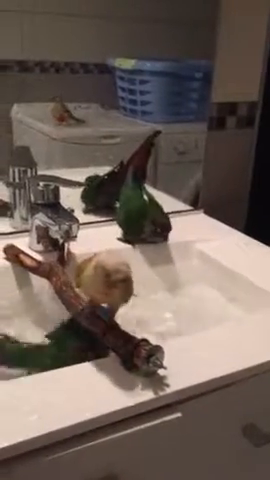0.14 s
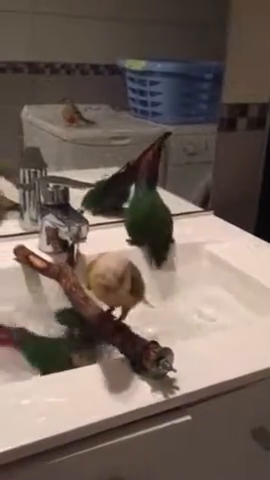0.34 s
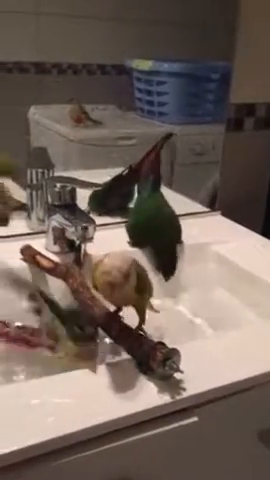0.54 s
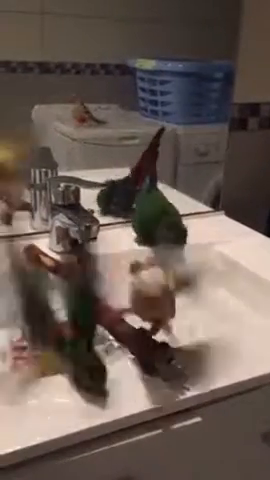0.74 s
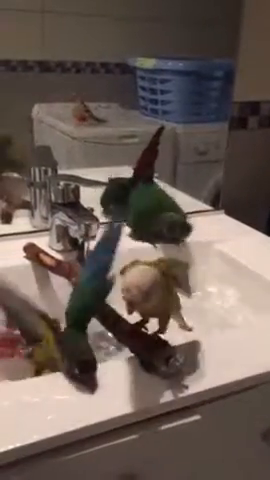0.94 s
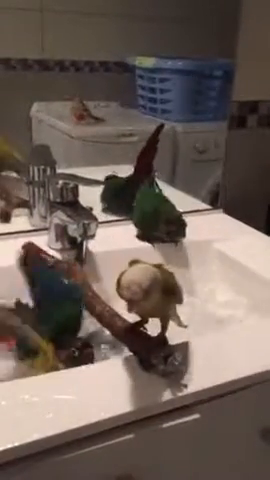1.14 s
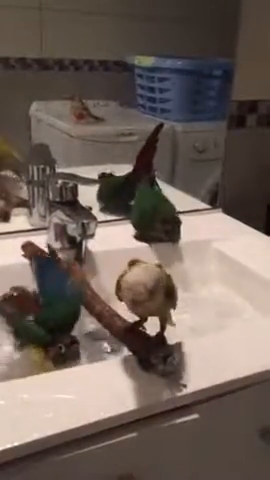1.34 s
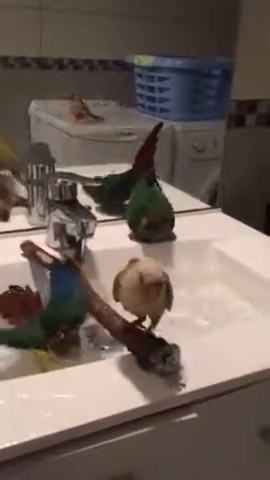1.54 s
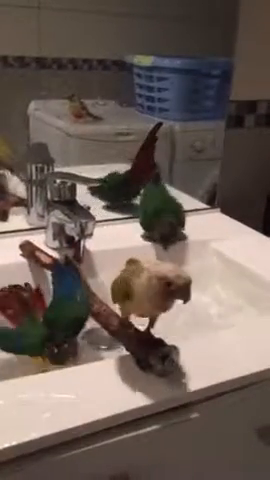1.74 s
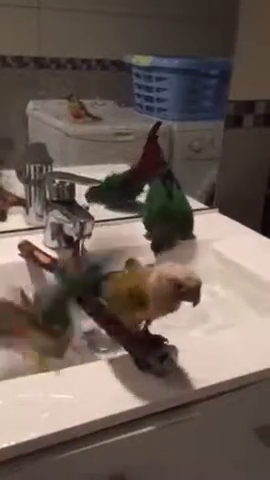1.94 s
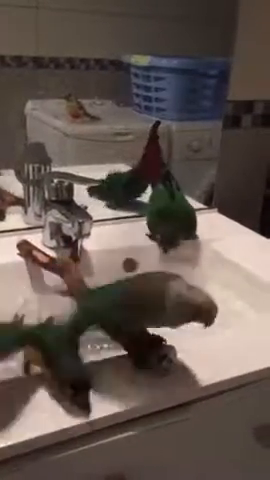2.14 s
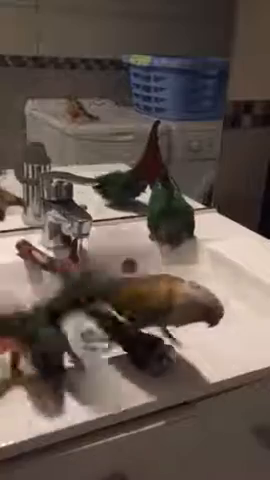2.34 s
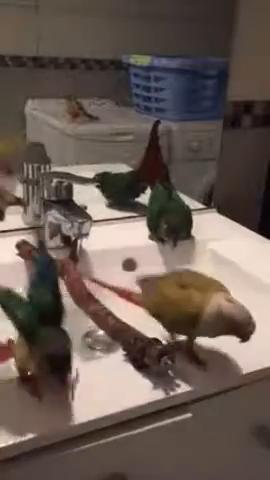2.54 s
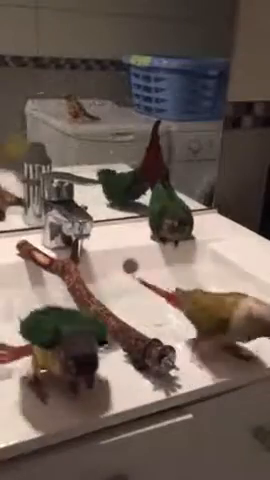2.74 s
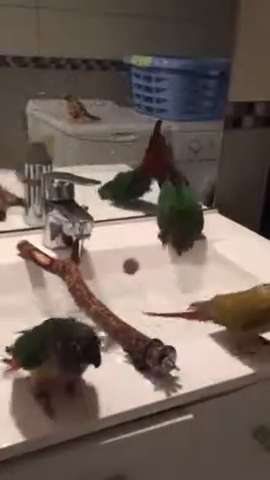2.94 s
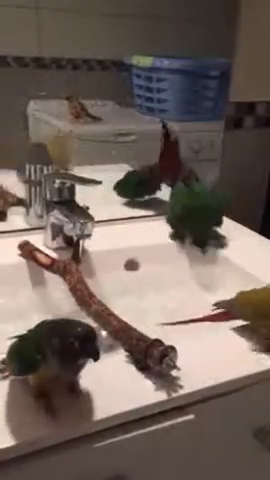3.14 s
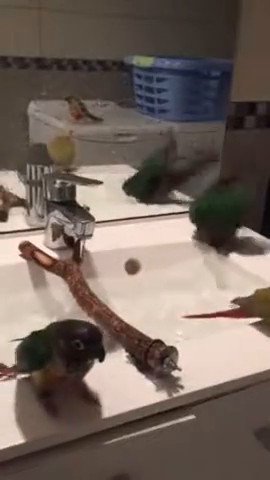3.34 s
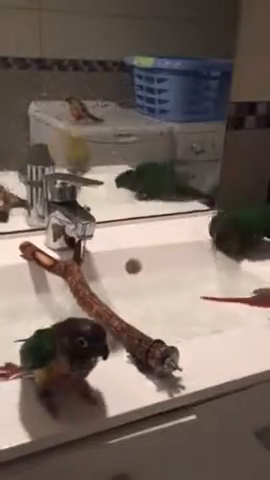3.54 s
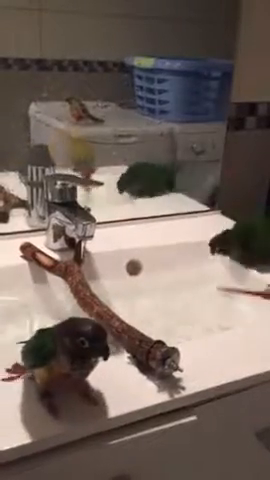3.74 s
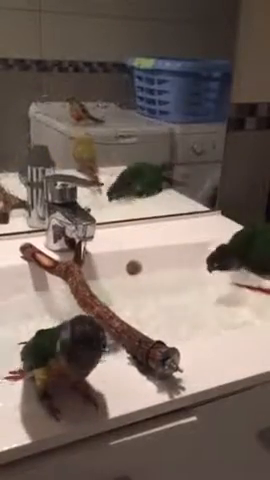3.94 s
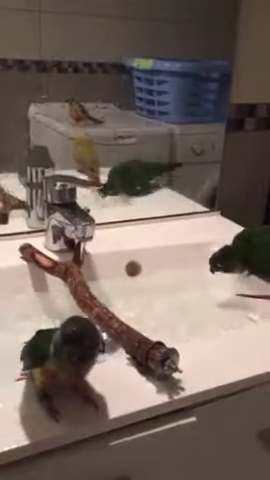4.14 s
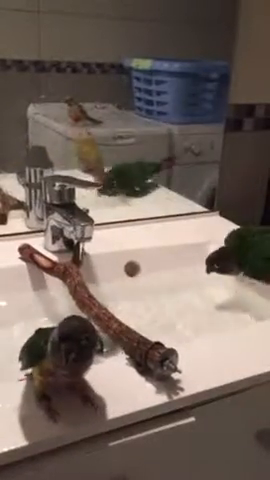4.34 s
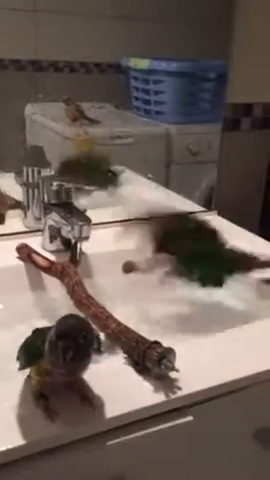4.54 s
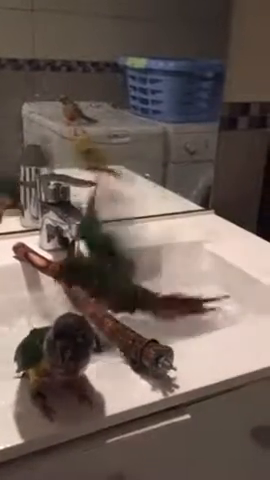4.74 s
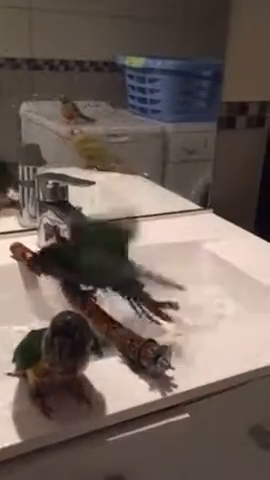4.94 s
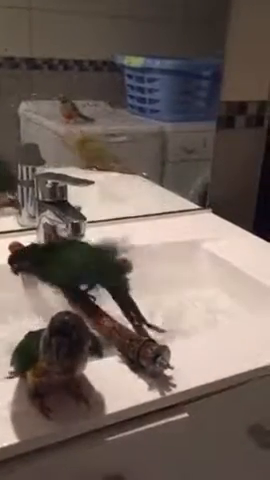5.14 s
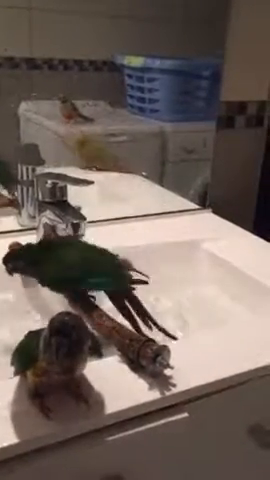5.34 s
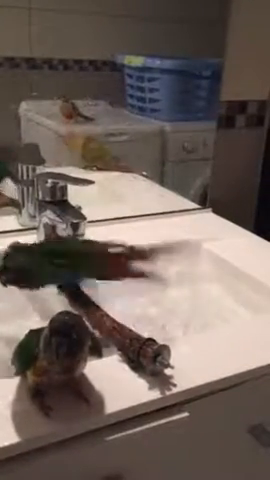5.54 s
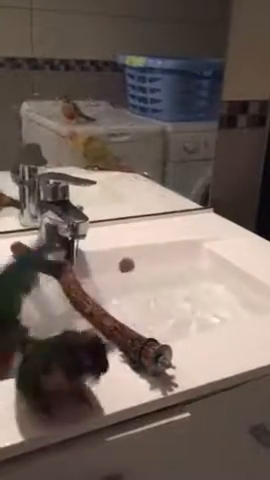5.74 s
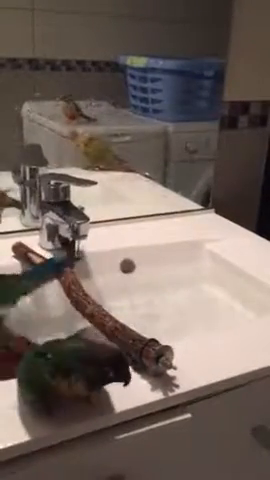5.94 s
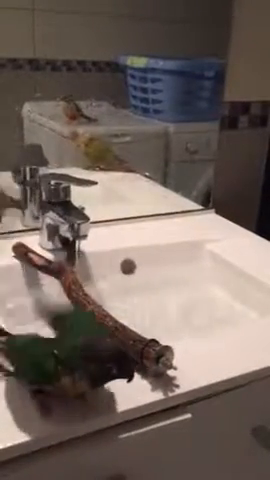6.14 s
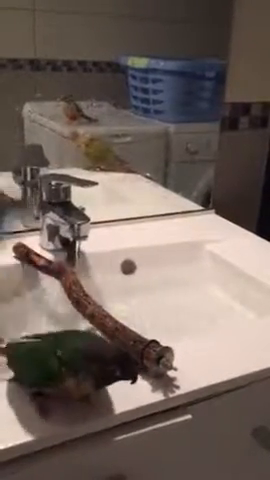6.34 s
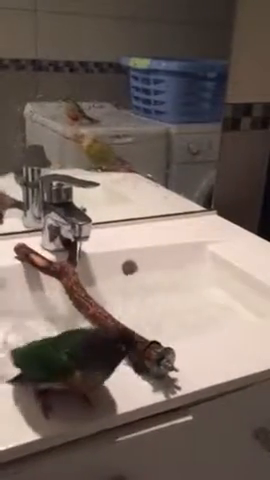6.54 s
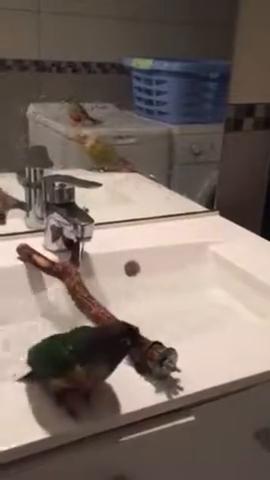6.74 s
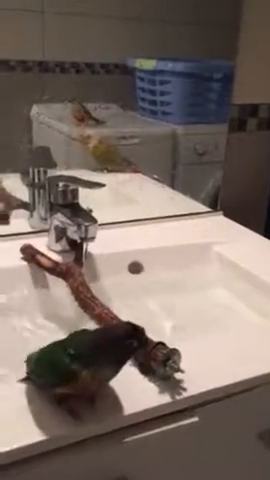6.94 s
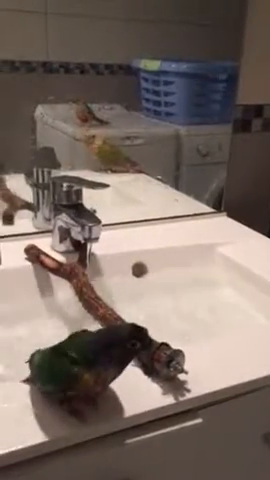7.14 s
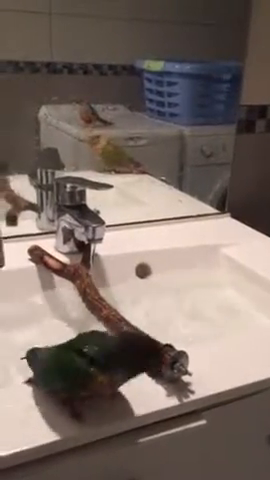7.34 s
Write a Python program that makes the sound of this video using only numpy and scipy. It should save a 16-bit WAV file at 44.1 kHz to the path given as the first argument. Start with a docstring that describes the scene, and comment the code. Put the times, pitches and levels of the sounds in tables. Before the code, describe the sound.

Small parrots splash and flap in shallow sink water in short bursts, with bubbly plops and faint drips in a tiled bathroom.

```python
"""Small parrots bathe in a bathroom sink, their wings slapping and churning the shallow water.
Each slap smacks the surface and rings the basin; the wingbeats push gusts of air and throw spray.
Bubbles plop and chirp among a few low basin booms and a thump, and single drops tick on the basin.
The tiled room echoes the water, over a few soft microphone bumps and a faint hush."""
import sys
import numpy as np
from scipy import signal
from scipy.fft import rfft, irfft
from scipy.io import wavfile
from scipy.ndimage import uniform_filter1d

SR = 44100
rng = np.random.default_rng(int(sys.argv[2]) if len(sys.argv) > 2 else 0)


def put_to_file(sound):
    """Save the sound as 16-bit audio at rate SR, in the file named by the first command-line argument."""
    columns = np.atleast_2d(sound).T  # one column per channel
    safe = np.clip(columns, -1, 1)
    whole_steps = np.round(safe * 32767)
    wavfile.write(sys.argv[1], SR, whole_steps.astype(np.int16))


N = 325899

# Wing or body hits on the water; cup, crack and thud are relative to the smack:
# start_s, smack_db, cup_db, crack_db, thud_db, cup_hz, smack_hz, growth_ms
WING_SLAPS = [(0.0198, -22.5, -17, -5.5, -32, 680, 2600, 0.98),
              (0.0253, -26, -8.5, -10, -33, 800, 3160, 2.9), (0.261, -29.5, -26, -13, -33, 834, 3150, 1.5),
              (0.388, -43, -9, 2, -34, 690, 3060, 1.1), (0.4209, -22, -0.5, -4.5, -20.5, 797, 3420, 1.3),
              (0.7476, -37, 8.5, 6, -13, 970, 2080, 0.41), (0.7524, -29, -14, 10.5, -27, 1030, 3150, 1.7),
              (0.811, -20.5, -13, -6, -26, 775, 4730, 5.8), (0.8252, -15.5, 3.5, 0, -14.5, 836, 2780, 1.5),
              (0.8973, -27, -18, -0.5, -14.5, 616, 3320, 1.5),
              (1.198, -30.5, -11, -4, -39, 1280, 3800, 0.24),
              (2.2108, -29.5, 0.5, 1, -12, 1140, 2920, 0.36),
              (2.236, -10.5, -4, -6, -29.5, 950, 2230, 0.71), (2.2547, -18, -11, 4, -17, 750, 4330, 0.77),
              (2.3468, -28, -16, -1, -23, 630, 2370, 0.8), (2.4292, -27, -6.5, -4, -16.5, 1190, 2980, 0.52),
              (2.9917, -37.5, -31, 4.5, -31, 1320, 2300, 0.36),
              (2.9956, -40, -2.5, -6, -28, 1380, 2580, 0.87),
              (3.5236, -48, -15, 10.5, -28, 965, 2520, 0.26),
              (3.5349, -30, -13, 0.5, -28.5, 865, 2500, 0.28), (4.7366, -31, -2, -0.5, -19, 600, 4570, 2.2),
              (4.751, -35.5, 6, 5, -7.5, 616, 2270, 1.1), (4.8099, -25, 0.5, -5, -17, 820, 3680, 1.34),
              (4.8223, -20, -8.5, -1.5, -18, 874, 3440, 1.24), (4.854, -22, -19, -17, -23, 820, 2780, 1.4),
              (4.8788, -26.5, -11, -4, -14.5, 600, 2380, 1.1),
              (4.9967, -26, -10, -1.5, -33, 706, 3950, 0.41), (5.0985, -28, -0.5, 0, -22.5, 760, 3760, 0.5),
              (5.2379, -36, -5, -5, -14.5, 1060, 2590, 0.45),
              (5.2987, -38.5, -3.5, 1.5, -19, 1190, 4480, 0.38),
              (5.7443, -38.5, -13, -4, -37, 1120, 2570, 1.6), (5.872, -32, 0, -20, -10, 660, 2400, 0.83),
              (5.9105, -34.5, -12, 1.5, -11, 725, 2030, 1.03), (6.056, -31, 5, -10, -17.5, 1190, 3930, 0.9),
              (6.0707, -10.5, -11, -9, -27, 584, 4320, 0.52), (6.2007, -12, -3.5, -4, -22, 610, 2840, 0.42),
              (6.205, -16.5, -1.5, 0, -31.5, 640, 4300, 0.69),
              (6.3205, -26, 2.5, -10, -13, 610, 3520, 0.54),
              (6.325, -14, -2.5, 3.5, -27.5, 796, 3760, 1.07), (6.418, -26, -11, 1, -13.5, 820, 3900, 0.37),
              (6.5928, -34, -3, 2.5, -16, 650, 2530, 0.7), (6.618, -28.5, -13, -7, -23.5, 575, 3630, 0.37)]
# Ringing modes of the basin: pitch_hz, gain_db, t60_s
BASIN_MODES = [(157.2, -2, 0.12), (195.5, 0.5, 0.28), (261.7, 4, 0.075), (369, 0.5, 0.39),
               (664, 18.5, 0.027), (775, -12, 0.019), (1283, 15, 0.0057)]
def slaps():
    """A ragged hit, then spatter: cupped air booms, the surface smacks, spray cracks, the basin rings."""
    t = np.arange(int(.15 * SR)) / SR
    shape = (len(WING_SLAPS), len(t))
    ragged = rng.standard_normal(shape) * amp(2 * np.minimum(rng.exponential(1, shape), 5))
    # each blow lands elsewhere on the basin and favours other modes
    mode_gains = amp(rng.normal(0, 3, (len(WING_SLAPS), len(BASIN_MODES))))
    spatter_shape = np.minimum(t / .0018, 1) * np.exp(-t / .02)   # thrown water lands just after
    out, shoves = np.zeros(N), np.zeros((len(BASIN_MODES), N))
    for slap, noise, gains in zip(WING_SLAPS, ragged, mode_gains):
        start_s, smack_db, cup_db, crack_db, thud_db, cup_hz, smack_hz, growth_ms = slap
        age = 1000 * t / max(growth_ms, .2)
        contact = (age / 2) ** 2 * np.exp(2 - age)
        spatter_db = -6.5 - .79 * (smack_db + 28)   # harder smacks carry a smaller share of spatter
        thrown = min(growth_ms / .5, 1) ** 2   # very short contacts throw less water
        burst = noise * (contact + amp(spatter_db) * thrown * spatter_shape)
        for part_db, low_hz, high_hz in ((cup_db, cup_hz / 1.246, cup_hz * 1.377),
                                         (0, smack_hz / 1.47, smack_hz * 1.67),
                                         (crack_db, 4600, 13000)):
            part = band(burst, low_hz, high_hz)
            add(out, start_s, amp(smack_db + part_db) * part / np.abs(part).max())
        for shove, gain in zip(shoves, gains):
            add(shove, start_s, gain * amp(smack_db + thud_db) * np.hanning(40) / 20)
    basin = sum(amp(db) * ring(shove, hz, t60_s) for shove, (hz, db, t60_s) in zip(shoves, BASIN_MODES))
    return out + amp(-4) * band(basin, 120, 4000)


# Level curves of the flapping, one list per bout: time_s, air_db, churn_db, spray_db
WING_BOUTS = [
    [(0.0, -53.5, -47, -44), (0.064, -50.5, -65, -45), (0.198, -69, -67.5, -58.5), (0.3, -57, -75, -64.5),
     (0.492, -69, -48, -55.5), (0.6, -84, -68, -79), (0.7, -92, -69, -61)],
    [(0.72, -61, -67, -59), (0.788, -47.5, -40.5, -36), (0.888, -40, -42, -46), (0.928, -47, -43.5, -44.5),
     (1.032, -50, -52, -54.5), (1.154, -74, -60, -71), (1.3, -75, -82, -91)],
    [(1.99, -75, -90, -90), (2.098, -46, -52, -53), (2.156, -39.5, -50.5, -48), (2.24, -42.5, -37, -44.5),
     (2.296, -41.5, -38.5, -44), (2.364, -43, -48, -45.5), (2.452, -43, -45.5, -49.5),
     (2.656, -53.5, -65.5, -58.5), (2.8, -91, -83.5, -82.5)],
    [(3.52, -77, -70, -64), (3.56, -61, -59, -56), (3.68, -89, -84, -81)],
    [(4.56, -89, -83, -85), (4.64, -57, -69, -65.5), (4.694, -45.5, -60, -57.5), (4.812, -40.5, -43, -39),
     (4.892, -41.5, -47.5, -35.5), (4.956, -61, -54, -52.5), (5.11, -53, -52.5, -50.5),
     (5.2, -63, -57.5, -63), (5.278, -55, -53, -52.5), (5.4, -69, -80, -94)],
    [(5.42, -66, -64.5, -60), (5.55, -65, -56, -68.5), (5.684, -87, -63.5, -72.5),
     (5.816, -50, -55.5, -49.5), (5.966, -85, -51.5, -57), (6.04, -63, -58, -78)],
    [(6.06, -50, -65, -66), (6.146, -57, -54.5, -55), (6.24, -54, -48, -59), (6.294, -51, -48, -48),
     (6.4, -54, -42.5, -50), (6.504, -55, -48, -53.5), (6.618, -51, -62, -51), (6.72, -64, -62.5, -66)],
    [(6.74, -72, -60, -56), (6.814, -73, -57.5, -66), (6.914, -89, -58, -68), (7.124, -81, -64.5, -61.5),
     (7.242, -89, -60, -67.5), (7.39, -89, -71, -70)],
]
def wingbeats():
    """Bouts of flapping drive air, churn and spray, with rests between; returns air and water."""
    times_s, *curves = np.transpose(np.concatenate(WING_BOUTS))
    t = np.arange(N) / SR
    air_db, churn_db, spray_db = [np.interp(t, times_s, curve) for curve in curves]
    in_bout = sum(1. * (t >= bout[0][0] - .01) * (t < bout[-1][0] + .01) for bout in WING_BOUTS)
    gate = uniform_filter1d(in_bout.clip(0, 1), 1500)
    bubbly = np.clip(.92 + .1 * (air_db + 69), 0, .95)   # only the gentlest flapping raises no bubbles
    stroke = np.clip(drift(17), -3, 1.2)   # uneven strokes shake churn and spray together
    air = wing_air(air_db)
    water = amp(churn_db) * churn(stroke, bubbly) + amp(spray_db) * spray(stroke, .68 * bubbly)
    return gate * air, gate * water


# Tone of feathers stirring water: freq_hz, relative_db
CHURN_SPECTRUM = [(150, -19.5), (250, -2.5), (295, -13), (364, 9), (429, -6.5), (714, 1), (1380, -2),
                  (3000, -3.5), (4550, -7), (8500, -28)]
def churn(stroke, bubbly):
    """Feathers stir the water: a grainy slosh blended with gurgling bubbles."""
    slosh = coloured(grains(per_s=1800, spread_db=2.1), CHURN_SPECTRUM) * amp(7.16 * stroke)
    bubbles = gurgle(per_s=800, low_hz=700, high_hz=3500, fade_cycles=32.5, swell_cycles=21.5)
    return np.sqrt(1 - bubbly) * slosh + np.sqrt(bubbly) * bubbles


# Tone of the falling spray: freq_hz, relative_db
SPRAY_SPECTRUM = [(1470, -12), (2500, 2.5), (3830, -4.5), (5960, -1), (9570, -8.5), (10500, -9.5),
                  (15800, -10.5), (16100, -28)]
def spray(stroke, fizzy):
    """Spray rains back: a dense patter blended with high pitched droplets."""
    patter = coloured(grains(per_s=4600, spread_db=3.3), SPRAY_SPECTRUM)
    patter *= amp(3 * stroke + 2.2 * drift(60))
    droplets = gurgle(per_s=220, low_hz=3500, high_hz=14400, fade_cycles=45, swell_cycles=20)
    return np.sqrt(1 - fizzy ** 2) * patter + fizzy * droplets


# Tone of the air off the wings: freq_hz, relative_db
AIR_SPECTRUM = [(12, -46), (20, -46), (49, 7.5), (103, -6.5), (161, 3.5), (325, -3), (361, -8), (450, -11),
                (580, -7.5), (990, -120)]
def wing_air(air_db, deep_below_hz=107):
    """Wings push lumpy gusts at the microphone; hard strokes push deeper air."""
    air = coloured(rng.standard_normal(N), AIR_SPECTRUM) * amp(air_db + 3.5 * drift(22))
    deep = signal.sosfiltfilt(signal.butter(2, deep_below_hz, fs=SR, output="sos"), air)
    bass_db = 1.5 + .46 * (air_db + 43.5)
    return air + deep * (amp(bass_db) - 1)


# Bubble plops, plus a few low basin booms and a thump:
# start_s, level_db, pitch_hz, fade_cycles (to fall 20 dB)
PLOPS_AND_BOOMS = [(0.439, -36.5, 3340, 40), (0.234, -44, 746, 13), (0.263, -36, 2890, 30),
                   (0.02, -37, 2590, 64), (0.234, -43, 1840, 17), (0.646, -40, 1730, 31),
                   (1.198, -43.5, 1282, 17), (1.32, -39.5, 2517, 48), (1.432, -29, 2985, 9.3),
                   (2.421, -33.5, 2900, 39), (2.539, -35, 1101, 37), (2.673, -38.5, 1652, 43),
                   (2.85, -46, 2740, 13.6), (3.777, -52.5, 2300, 31), (3.935, -39.5, 3080, 39),
                   (4.632, -38.5, 198, 4.1), (4.871, -38, 159, 17), (5.092, -38.5, 166, 9.5),
                   (4.58, -49, 1830, 29), (5.043, -33.5, 1750, 17), (5.277, -44.5, 1223, 88),
                   (5.368, -44, 888, 17), (5.431, -41, 840, 9.2), (5.46, -30, 840, 9.2),
                   (5.504, -28.5, 867, 11), (5.573, -34, 863, 15), (5.621, -39.5, 1104, 21),
                   (5.666, -40.5, 1073, 45), (5.75, -32, 1076, 14), (5.789, -28.5, 1046, 15),
                   (5.82, -32, 944, 10), (5.959, -34, 900, 8.9), (5.988, -34.5, 1220, 12),
                   (6.158, -35.5, 1142, 33), (6.733, -34.5, 1990, 9.8), (6.756, -45, 1660, 44),
                   (6.807, -36, 1530, 28), (6.856, -28.5, 788, 23), (6.877, -23.5, 1020, 6.7),
                   (6.938, -39, 846, 13), (6.964, -39.5, 1080, 25), (7.045, -39, 910, 16),
                   (7.091, -44.5, 4500, 25), (7.135, -35.5, 1015, 29), (7.232, -30, 1030, 9.8),
                   (7.258, -31, 874, 11), (7.358, -44, 1106, 36), (5.504, -43, 1530, 17),
                   (5.5702, -41.5, 2610, 18), (5.784, -39.5, 1590, 74), (6.593, -31.5, 2380, 14),
                   (6.88, -24.5, 1860, 7.8), (7.046, -45, 2490, 38), (7.134, -43, 2350, 16),
                   (1.0944, -35.5, 2020, 7.7), (1.1627, -44.5, 1785, 36), (2.981, -46, 2120, 80),
                   (1.387, -38, 3580, 14), (3.688, -44.5, 3730, 11), (5.872, -32.5, 344.6, 22),
                   (6.325, -25.5, 272, 11)]
def plops_and_booms(rise_octaves=.15, wobble_share=.02, flutter_db=3):
    """Fading, trembling sines that climb: bubbles nearing the surface; the lowest boom or thump."""
    out, t = np.zeros(N), np.arange(int(.12 * SR)) / SR
    knots_s, onset = np.linspace(0, t[-1], 25), np.minimum(t / .01, 1)
    for start_s, level_db, pitch_hz, fade_cycles in PLOPS_AND_BOOMS:
        wobble, flutter = [onset * np.interp(t, knots_s, shake) for shake in rng.standard_normal((2, 25))]
        age = t * pitch_hz / fade_cycles
        glide_hz = pitch_hz * 2 ** (rise_octaves * (np.minimum(age, 2) - .3))
        phase = 2 * np.pi * np.cumsum(glide_hz * (1 + wobble_share * wobble)) / SR
        attack = np.minimum(t * pitch_hz / 2.54, 1)
        add(out, start_s, attack * amp(level_db + flutter_db * flutter - 20 * age) * np.sin(phase))
    return out


# Necks of air closing: start_s, level_db, from_hz, to_hz, length_s
NECK_CHIRPS = [(1.321, -41, 2520, 3500, 0.0028), (3.934, -32, 2670, 4680, 0.0034),
               (6.862, -44, 1810, 3920, 0.0191), (6.998, -53, 2660, 3400, 0.012),
               (7.18, -57.5, 2870, 3470, 0.011), (7.229, -58, 3330, 3920, 0.01)]
def chirps():
    """A neck of air pinches shut in a quick upward sine sweep."""
    out = np.zeros(N)
    for start_s, level_db, from_hz, to_hz, length_s in NECK_CHIRPS:
        sweep_hz = np.geomspace(from_hz, to_hz, int(length_s * SR))
        phase = 2 * np.pi * np.cumsum(sweep_hz) / SR
        add(out, start_s, amp(level_db) * np.hanning(len(phase)) * np.sin(phase))
    return out


# Single drops on the basin: start_s, level_db, pitch_hz
DROP_TICKS = [(0.141, -36, 11300), (1.093, -47, 4400), (1.391, -38.5, 7700), (1.308, -51.5, 14440),
              (1.408, -50, 6600), (1.41, -46, 9900), (1.8558, -47, 7570), (1.9654, -42.5, 13400),
              (3.347, -40.5, 8500), (3.467, -52.5, 4450), (3.665, -50.5, 13000), (3.669, -51.5, 8300),
              (3.9358, -40, 5570), (3.4675, -45.5, 13540), (5.456, -42, 14100), (6.692, -43, 5060),
              (7.043, -29.5, 8350), (7.146, -39, 14700), (7.185, -41, 11200), (7.178, -42, 4900)]
def ticks():
    """Each drop lands with a thin snap and a rounded click of a few cycles."""
    out, t = np.zeros(N), np.arange(int(.01 * SR)) / SR
    snap = amp(-6) * band(1. * (t == 0), 5000, 15500)
    for start_s, level_db, pitch_hz in DROP_TICKS:
        age = t * pitch_hz / 2.6
        click = age * np.exp(1 - age) * np.sin(2 * np.pi * pitch_hz * t)
        add(out, start_s, amp(level_db) * (click + snap))
    return out


def gurgle(per_s, low_hz, high_hz, fade_cycles, swell_cycles):
    """Many small bubbles, each swelling and fading at the pitch of its size; rms 1."""
    births, sizes = grains(per_s, spread_db=2.6), rng.integers(0, 24, N)
    out = np.zeros(N)
    for size, hz in enumerate(np.geomspace(low_hz, high_hz, 24)):
        fading = ring(births * (sizes == size), hz, fade_cycles / hz)
        out += hz * ring(fading, hz, swell_cycles / hz)   # the second resonance softens the attack
    return rms_one(out)


# Reverb of the tiled room: freq_hz, t60_s, relative_db
TILE_REVERB = [(100, 0.56, 0.5), (513, 0.44, -1.5), (2160, 0.39, 0), (6000, 0.46, -5.5), (15600, 0.29, -2)]
def bathroom(x):
    """Dense echoes off tiled walls, each half octave dying at its own rate."""
    t, edges_hz = np.arange(int(.9 * SR)) / SR, 60 * 2 ** np.arange(0, 8.3, .5)
    noise, room = rng.standard_normal((2, len(t))), np.array(TILE_REVERB)
    tail = np.zeros(len(t))
    for k, (low_hz, high_hz) in enumerate(zip(edges_hz, edges_hz[1:])):
        centre_hz = np.sqrt(low_hz * high_hz)
        t60_s, level_db = at_hz(room, centre_hz), at_hz(room[:, ::2], centre_hz)
        tail += band(noise[k % 2], low_hz, high_hz) * amp(level_db - 60 * t / t60_s)
    tail *= np.clip((t - .002) / .0061, 0, 1)   # the first walls are about a metre away
    return signal.fftconvolve(x, tail / np.sqrt(np.sum(tail ** 2)))[:N]


# Soft low bumps at the microphone: start_s, level_db, pitch_hz
MIC_BUMPS = [(0.263, -42.5, 100), (6.78, -44.5, 54.7), (6.949, -49.5, 86), (7.009, -43.5, 59)]
def bumps():
    """Each bump swings the microphone through two and a half slow cycles."""
    out = np.zeros(N)
    for start_s, level_db, pitch_hz in MIC_BUMPS:
        cycles = np.arange(int(2.5 * SR / pitch_hz)) * pitch_hz / SR
        add(out, start_s, amp(level_db) * np.hanning(len(cycles)) * np.sin(2 * np.pi * cycles))
    return out


# Tone of the noise bed: freq_hz, relative_db
HUSH_SPECTRUM = [(30, -29.5), (46, -5.5), (191, -10), (314, -12.5), (407, -17), (686, -19), (1220, -18),
                 (2340, -22), (4980, -27), (11500, -25.5), (15850, -31.5), (16150, -50.5)]
# A faint hum and whine: pitch_hz, level_db
FAINT_TONES = [(312, -79.5), (11709, -85)]
def hush(level_db=-67.5):
    """Room and microphone noise under two faint tones that waver in level."""
    t = np.arange(N) / SR
    tones = sum(amp(db + 2 * drift(6)) * np.sin(2 * np.pi * hz * t) for hz, db in FAINT_TONES)
    return amp(level_db + .5 * drift(3)) * coloured(rng.standard_normal(N), HUSH_SPECTRUM) + tones


def amp(db):
    """Decibels to gain."""
    return 10 ** (np.asarray(db) / 20)


def rms_one(x):
    """Scale to rms 1."""
    return x / np.sqrt(np.mean(x ** 2) + 1e-20)


def at_hz(points, hz):
    """Read a table's second column on a log-frequency axis."""
    points = np.array(points)
    return np.interp(np.log(hz + 1), np.log(points[:, 0]), points[:, 1])


def coloured(x, spectrum):
    """Shape a full-length signal with a spectrum; rms 1."""
    hz = np.arange(N // 2 + 1) * SR / N
    return rms_one(irfft(rfft(x) * amp(at_hz(spectrum, hz)), N))


def band(x, low_hz, high_hz):
    """Band-pass."""
    return signal.sosfilt(signal.butter(2, [low_hz, high_hz], "band", fs=SR, output="sos"), x)


def drift(rate_hz):
    """A smooth random wander of rms about 1."""
    hop = 40
    pole = np.exp(-2 * np.pi * rate_hz * hop / SR)
    slow = signal.lfilter([1], [1, -2 * pole, pole * pole], rng.standard_normal(N // hop + 2002))[2000:]
    return np.interp(np.arange(N) / hop, np.arange(len(slow)), rms_one(slow))


def grains(per_s, spread_db):
    """Random impacts, most small and a few large."""
    sizes = amp(spread_db * np.minimum(rng.exponential(1, N), 5)) * rng.choice([-1, 1], N)
    return sizes * (rng.random(N) < per_s / SR)


def ring(x, hz, t60_s):
    """One decaying mode, driven by x."""
    radius, angle = amp(-60 / (t60_s * SR)), 2 * np.pi * hz / SR
    return signal.lfilter([0, np.sin(angle)], [1, -2 * radius * np.cos(angle), radius ** 2], x + 1e-18)


def add(track, start_s, sound):
    """Mix a sound in at a time."""
    i = round(start_s * SR)
    track[i:i + len(sound)] += sound[:N - i]


def scene():
    """Mono mix: the water and its echo, with dry wing air, bumps and hush."""
    air, water = wingbeats()
    # faint droplets run off the feathers at random
    runoff = amp(-80) * gurgle(per_s=35, low_hz=4500, high_hz=15000, fade_cycles=9, swell_cycles=4)
    splash = water + slaps()
    bowl = plops_and_booms() + chirps()
    drops = runoff + ticks()
    # sounds deep in the bowl echo most, drops on the near rim least
    echo = bathroom(amp(-8) * splash + amp(-6) * bowl + amp(-10) * drops)
    return (splash + bowl + drops + echo + air + bumps() + hush())[None]


# Treble dips of the microphone: centre_hz, width_hz, depth (0-1)
MIC_NOTCHES = [(4970, 190, 0.34), (7570, 455, 0.32), (10450, 870, 0.6)]
def record(dry):
    """The microphone drops the deepest bass, notches the treble and cuts the very top."""
    low_cut_hz, high_cut_hz = 36, 16800
    out = signal.sosfilt(signal.butter(4, low_cut_hz, "high", fs=SR, output="sos"), dry)
    for centre_hz, width_hz, depth in MIC_NOTCHES:
        out = out - depth * signal.lfilter(*signal.iirpeak(centre_hz, centre_hz / width_hz, fs=SR), out)
    return signal.sosfilt(signal.cheby2(12, 60, high_cut_hz, fs=SR, output="sos"), out)


dry = scene()
out = record(dry)
put_to_file(out)
```